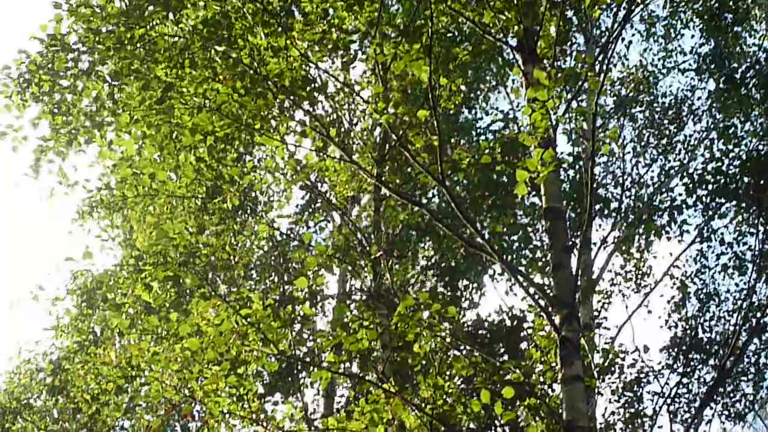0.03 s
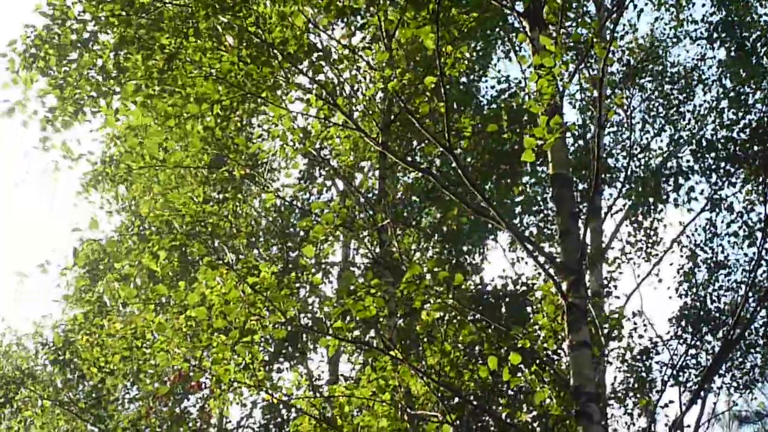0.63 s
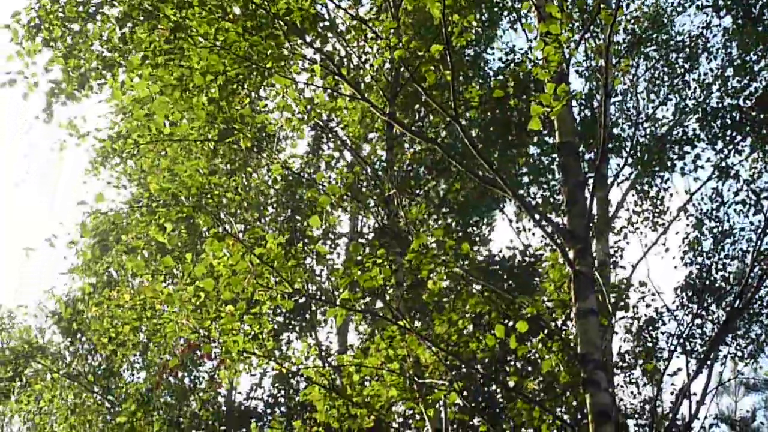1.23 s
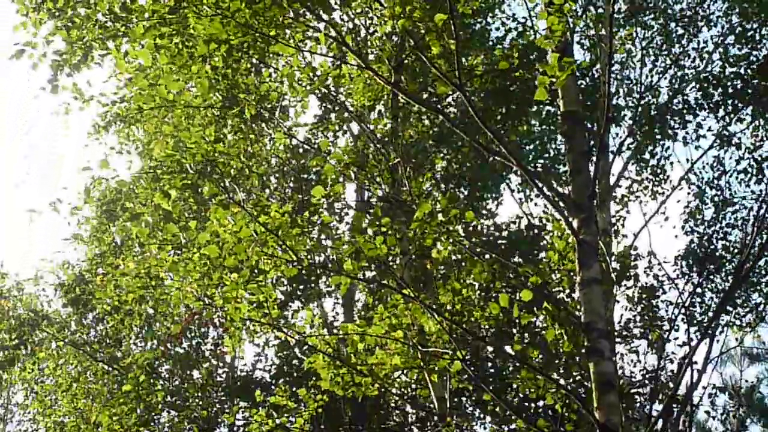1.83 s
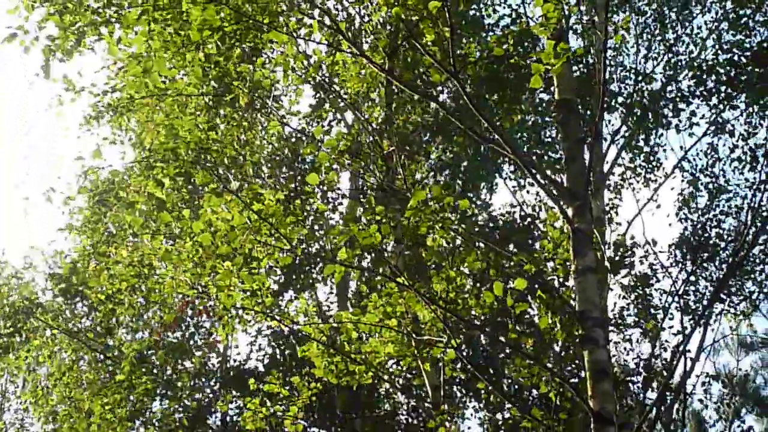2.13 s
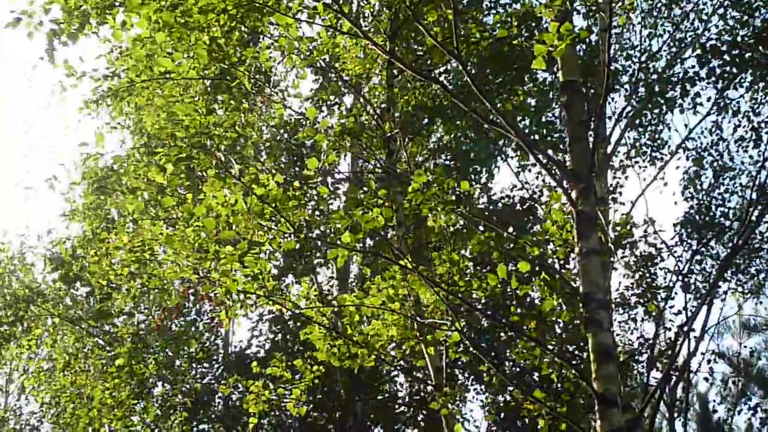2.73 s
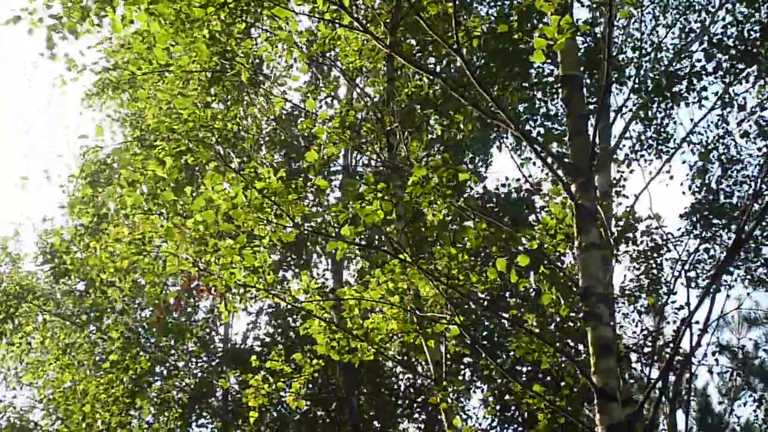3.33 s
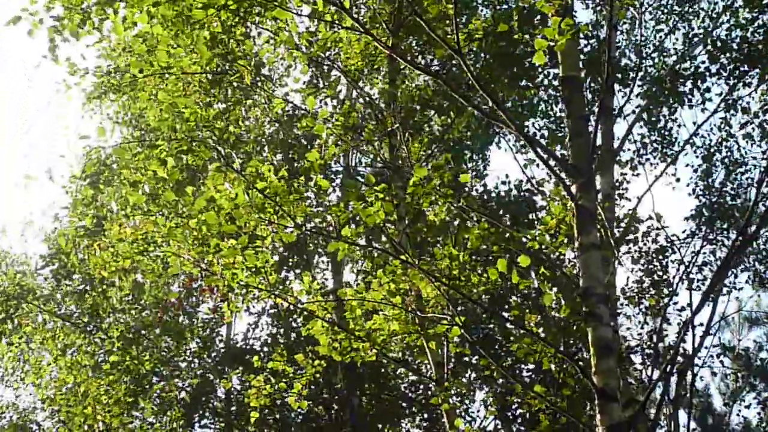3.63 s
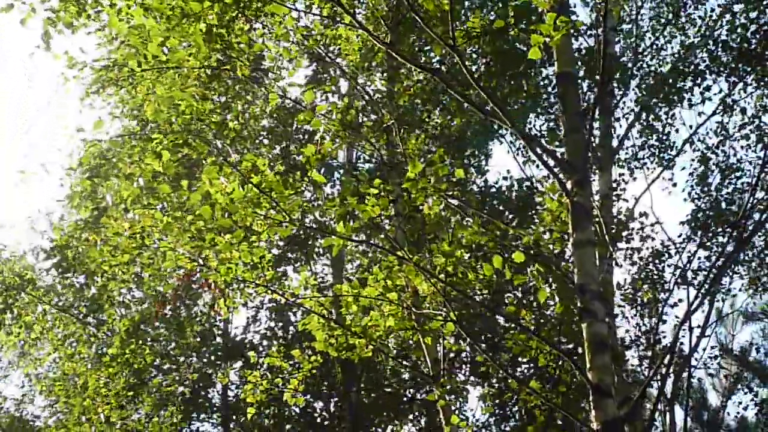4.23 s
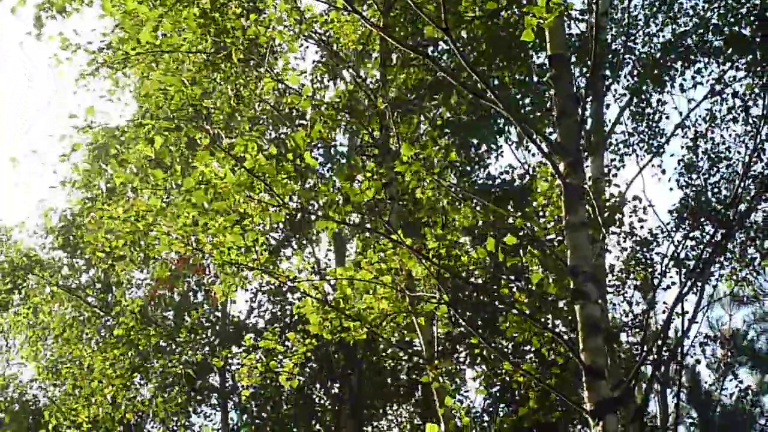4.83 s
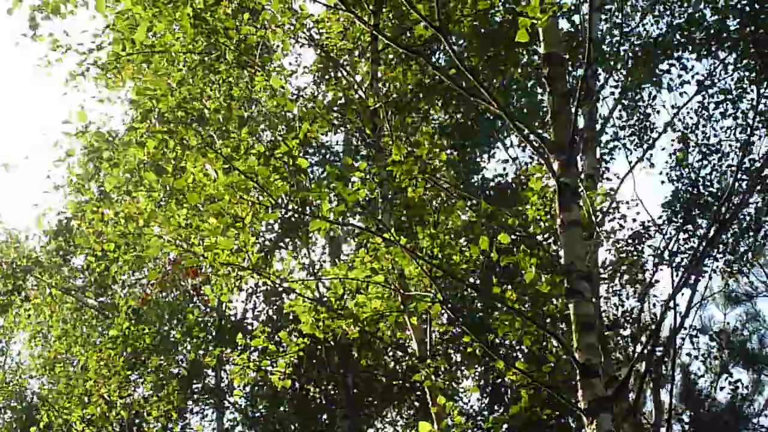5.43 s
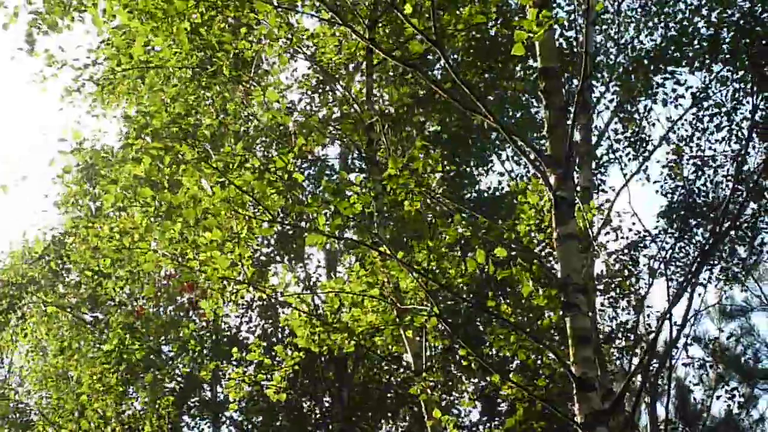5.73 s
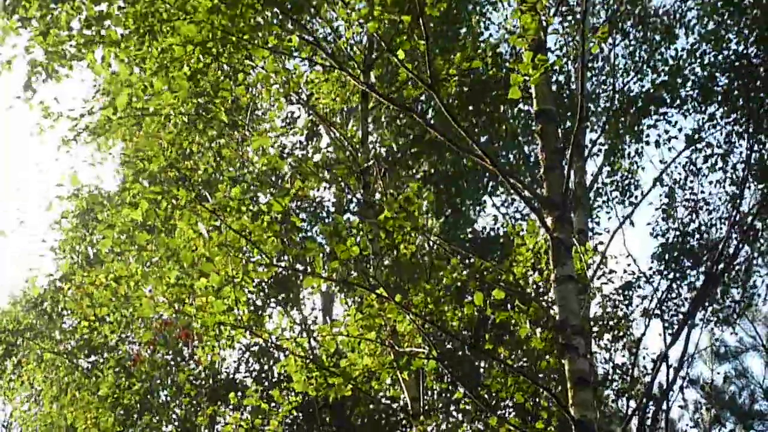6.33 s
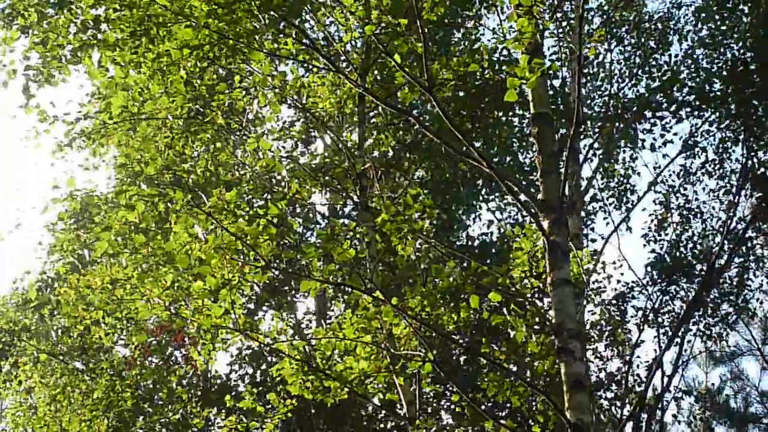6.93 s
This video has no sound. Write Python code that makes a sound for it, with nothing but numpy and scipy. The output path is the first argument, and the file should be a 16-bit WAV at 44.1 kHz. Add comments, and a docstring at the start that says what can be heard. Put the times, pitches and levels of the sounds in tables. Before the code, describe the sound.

Wind blows through a birch wood for about seven seconds, quiet overall. Nearby leaves make a fine, high rustling hiss over the dull, even roar of distant treetops. Air passing the microphone adds a light, lumpy low rumble throughout. Between 0.4 and 0.8 seconds, a few short, low wind thuds hit the microphone, the strongest at about 0.6 seconds. The leaves swell slightly around 1.7 seconds and settle again. More soft thuds come between 2.7 and 3.2 seconds, with a brief puff of rumble near 3 seconds and a smaller one at 3.7. Another bump falls near 4.7 seconds, and a swell of rumble with a few light thuds near 5.8. From about 5 seconds a stronger gust builds in the leaves, their hiss rising steadily until it is loudest at the end.

```python
"""Wind in a birch wood

Far treetops roar softly. Near leaves brush each other in a fine hiss that swells as a gust arrives.
Air tumbling past a small camera microphone rumbles, and little swirls of it thud now and then.
The camera adds a very faint whine and cuts three notches (narrow gaps) out of the treble."""
import sys
import numpy as np
from scipy import signal
from scipy.fft import rfft, irfft
from scipy.io import wavfile

SR = 44100
rng = np.random.default_rng(int(sys.argv[2]) if len(sys.argv) > 2 else 0)


def file_out(sig):
    """Save sig as 16-bit WAV at sys.argv[1]."""
    # one column per channel
    cols = np.atleast_2d(sig).T
    # limit, then scale
    lim = np.clip(cols, -1, 1)
    pcm = np.round(lim * 32767).astype(np.int16)
    wavfile.write(sys.argv[1], SR, pcm)


N = 316638
TIME = np.arange(N) / SR
FREQS = np.fft.rfftfreq(N, 1 / SR)

# Tone of the far treetops: pitch_hz, relative_level_db
TREETOP_SPECTRUM = [(20, -17.5), (100, -9.5), (200, -1), (300, 0.5), (450, 1), (650, -1.5), (900, -4.5),
                    (1500, -10), (2300, -12.5), (3800, -12.5), (6500, -14), (8500, -47.5)]
# Tone of the air tumbling past the microphone: pitch_hz, relative_level_db
RUMBLE_SPECTRUM = [(10, -27), (30, -14.5), (60, -3), (110, 0.5), (170, -0.5), (260, -9.5), (500, -27.5),
                   (2000, -60.5)]
# Puffs of air that swell and fade at the microphone: peak_s, length_s, level_db
AIR_PUFFS = [(3.08, 0.24, -49.5), (3.68, 0.067, -53.5), (4.555, 1, -59.5), (5.8, 0.92, -56.5)]
# The strongest swirls of air that hit the microphone: middle_s, level_db, pitch_hz
AIR_SWIRLS = [(0.388, -35.5, 130), (0.407, -37.5, 136), (.569, -23.5, 137), (0.597, -35.5, 118),
              (0.776, -42, 121), (2.657, -36, 134), (2.958, -36.5, 161), (2.978, -37, 153),
              (3.179, -36, 182), (4.67, -35.5, 113), (5.739, -36.5, 144), (5.855, -39.5, 112),
              (5.934, -40, 158)]
# Tone of the near leaves: pitch_hz, relative_level_db
LEAF_SPECTRUM = [(200, -22), (700, -8), (2000, -11), (3000, -13), (3900, -7.5), (4700, -3), (5400, 0),
                 (6300, 1.3), (7200, -1.1), (7700, -5), (8300, -12.5), (8700, -23.5), (9100, -43.5)]
# Gusts in the near birch, a mild one and then a strong one: peak_s, length_s, rise_db
BIRCH_GUSTS = [(1.698, 2.7, 2.5), (7.3, 4.34, 10)]
# Narrow gaps that the camera cuts out of the treble: pitch_hz, width_hz
TREBLE_NOTCHES = [(3002, 900), (4398, 860), (8000, 660)]


def gain_of(db):
    """Turns decibels into a number to multiply by."""
    return 10 ** (np.asarray(db) / 20)


def unit_level(sound):
    """Scales a sound so that its average level (rms) is 1."""
    return sound / np.sqrt(np.mean(sound ** 2) + 1e-20)


def with_tone(sound, spectrum):
    """Shapes the lows and highs with a spectrum table; the result has level 1."""
    hz, db = np.transpose(spectrum)
    curve_db = np.interp(np.log(FREQS + 1), np.log(hz), db)
    return unit_level(irfft(rfft(sound) * gain_of(curve_db), N))


def band(sound, hz, width_hz):
    """Keeps only the pitches around hz; the result has level 1."""
    bell = np.exp(-2 * ((FREQS - hz) / width_hz) ** 2)
    return unit_level(irfft(rfft(sound) * bell, N))


def wander(rate_hz):
    """A random wobble, up to about rate_hz times a second."""
    return band(rng.standard_normal(N), 0, 2 * rate_hz)


def swell(peak_s, length_s):
    """A smooth hump that rises to 1 at peak_s and falls again."""
    return np.exp(-(2 * (TIME - peak_s) / length_s) ** 2)


def wind(calm_db=-59):
    """The wind's strength as a sound level in dB: each gust swells out of the calm."""
    return calm_db + sum(rise_db * swell(peak_s, length_s) for peak_s, length_s, rise_db in BIRCH_GUSTS)


def camera_whine(pitch_hz=2343, level_db=-83.0):
    """The camera gives off a very faint, steady tone."""
    return gain_of(level_db) * unit_level(np.sin(2 * np.pi * pitch_hz * TIME))


def far_treetops(wind_db, level_db=-51, gust_share=0.054, moan_hz=420, moan_relative_db=-16):
    """Countless far twigs blur into a dull roar with a faint low moan. It barely follows the gusts."""
    roar = with_tone(rng.standard_normal(N), TREETOP_SPECTRUM)
    moan = gain_of(moan_relative_db) * band(rng.standard_normal(N), moan_hz, width_hz=30)
    rise_db = gust_share * (wind_db - wind_db.mean())
    return gain_of(level_db + rise_db) * (roar + moan)


def air_rumble(draught_db=-60.5, wobble_db=0.5):
    """Air tumbling past the microphone makes a lumpy low noise: a steady draught with puffs on top."""
    puff_power = sum(gain_of(db) ** 2 * swell(peak_s, length_s) for peak_s, length_s, db in AIR_PUFFS)
    loudness = np.sqrt(gain_of(draught_db) ** 2 + puff_power)
    lumps = gain_of(wobble_db * wander(rate_hz=21))
    low_noise = with_tone(rng.standard_normal(N), RUMBLE_SPECTRUM)
    return loudness * unit_level(low_noise * lumps)


def air_thuds(fade_cycles=0.64):
    """Each swirl pulls, then pushes on the microphone: a soft thud of little more than one wave."""
    thuds = np.zeros(N)
    for middle_s, level_db, pitch_hz in AIR_SWIRLS:
        near = abs(TIME - middle_s) < .04
        cycles = (TIME[near] - middle_s) * pitch_hz
        fade = np.exp(-(cycles / fade_cycles) ** 2)
        thuds[near] += gain_of(level_db) * np.sin(2 * np.pi * cycles) * fade
    return thuds


def leafy_twig(wind_db, usual_touches_per_s=9000, flutter_db=0.34, flutter_hz=22):
    """Leaves touch in tiny ticks, more often in a gust. Their level wobbles as the twig flutters."""
    touches_per_s = usual_touches_per_s * gain_of(wind_db - wind_db.mean())
    strengths = rng.standard_normal(N)
    touching = rng.random(N) < touches_per_s / SR
    ticks = strengths * touching / np.sqrt(touches_per_s)  # more ticks, but no louder overall
    return ticks * gain_of(flutter_db * wander(flutter_hz))


def near_birch(wind_db, boost_db=2.1, twigs=12, top_hz=9100):
    """Many twigs, each ticking in its own range of pitch, add up to a rustle that grows with the wind."""
    pitches_hz = np.linspace(0, top_hz, twigs)
    rustle = sum(band(leafy_twig(wind_db), hz, width_hz=2500) for hz in pitches_hz)
    return gain_of(wind_db + boost_db) * with_tone(rustle, LEAF_SPECTRUM)


def scene():
    """Adds the trees, the air on the microphone and the whine into one channel."""
    wind_db = wind()
    trees = far_treetops(wind_db) + near_birch(wind_db)
    return (trees + air_rumble() + air_thuds() + camera_whine())[None]


def record(dry):
    """The camera cuts three notches, drops the highest treble and shifts the wave a little below zero."""
    cutoff_hz, offset = 9100, -.0369
    for pitch_hz, width_hz in TREBLE_NOTCHES:
        notch = signal.iirnotch(pitch_hz, pitch_hz / width_hz, SR)
        dry = signal.lfilter(*notch, dry)
    low_pass = signal.firwin(511, cutoff_hz, window=("kaiser", 9), fs=SR)
    return offset + signal.oaconvolve(dry, low_pass[None], "same")


dry = scene()
out = record(dry)
file_out(out)
```